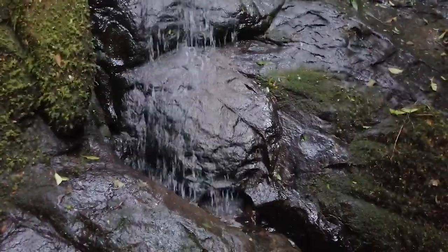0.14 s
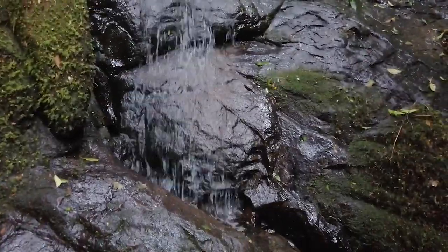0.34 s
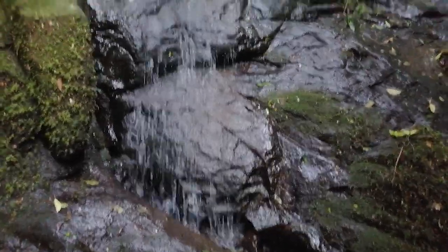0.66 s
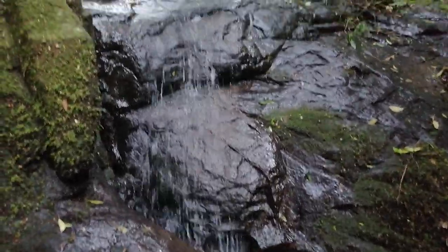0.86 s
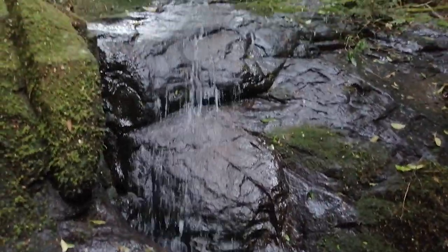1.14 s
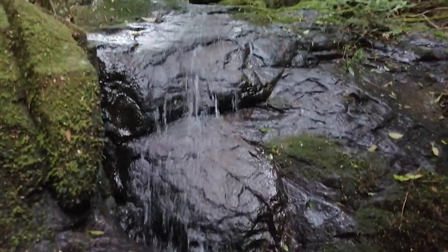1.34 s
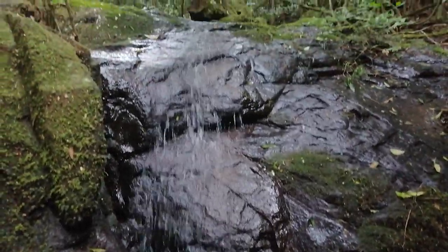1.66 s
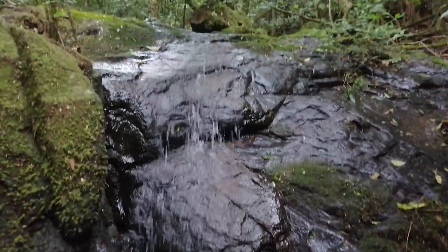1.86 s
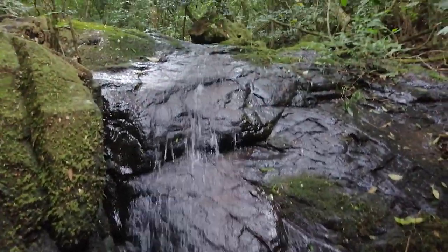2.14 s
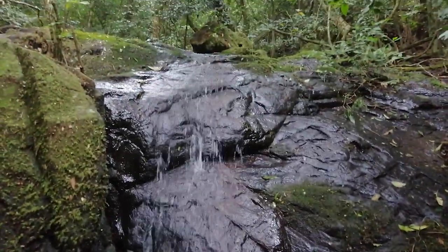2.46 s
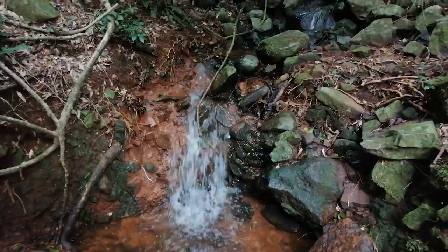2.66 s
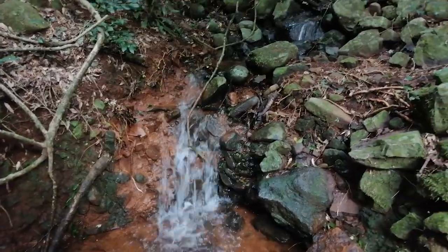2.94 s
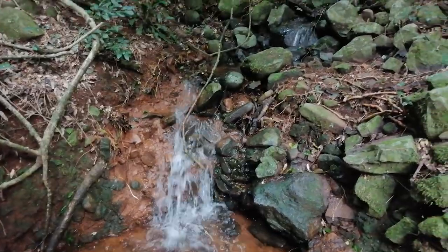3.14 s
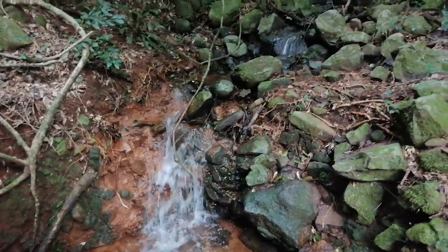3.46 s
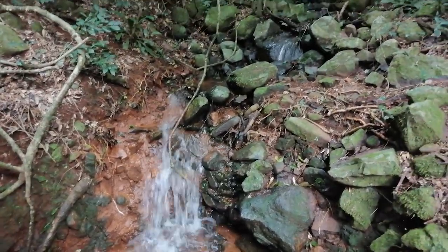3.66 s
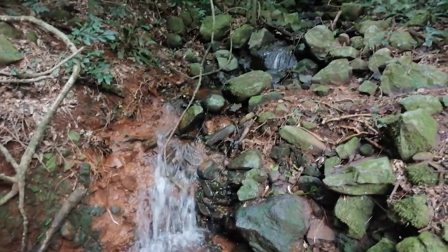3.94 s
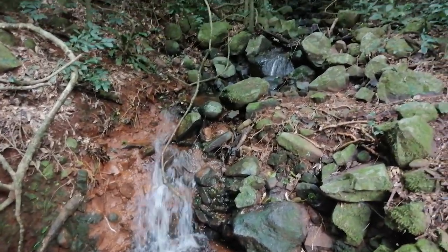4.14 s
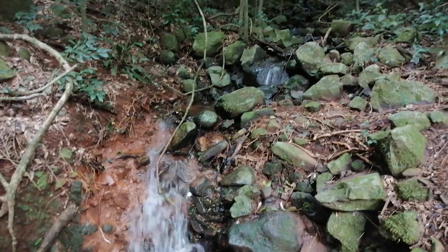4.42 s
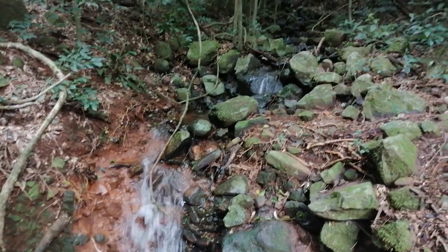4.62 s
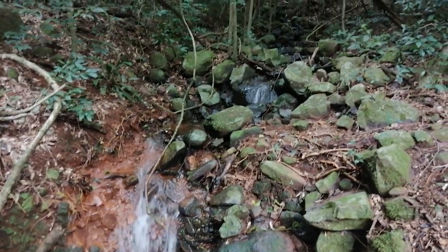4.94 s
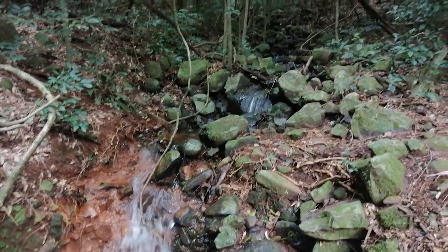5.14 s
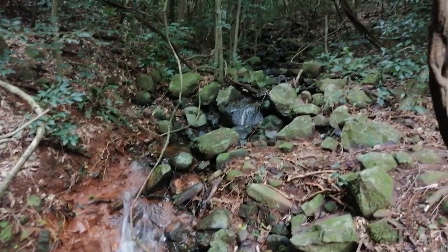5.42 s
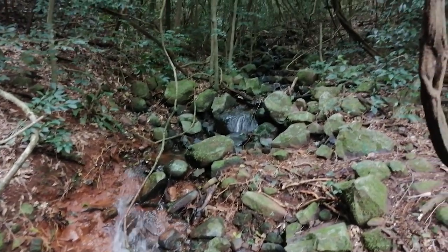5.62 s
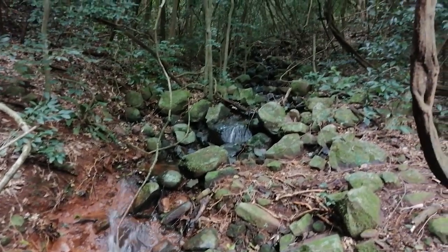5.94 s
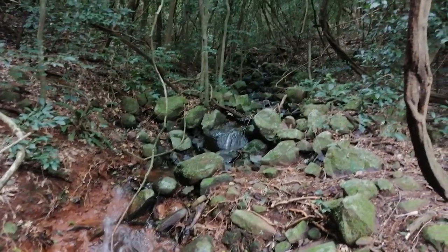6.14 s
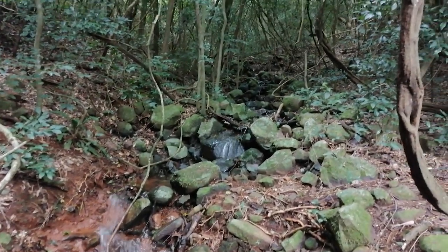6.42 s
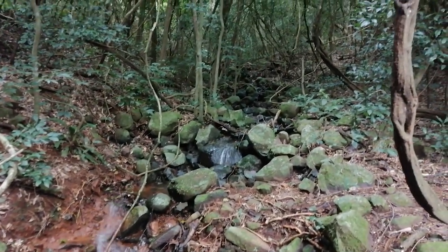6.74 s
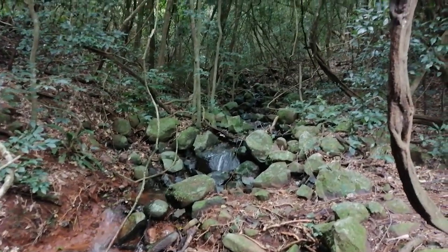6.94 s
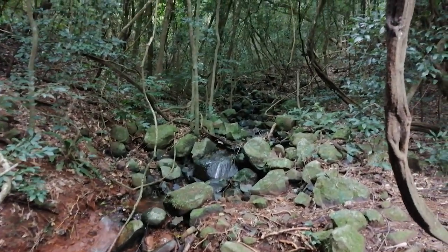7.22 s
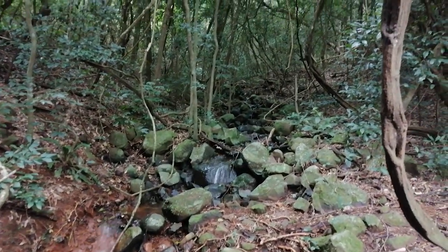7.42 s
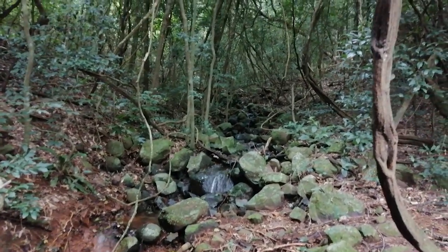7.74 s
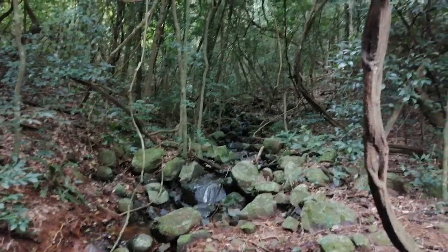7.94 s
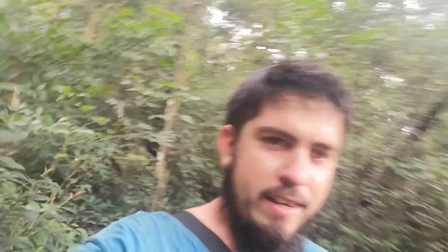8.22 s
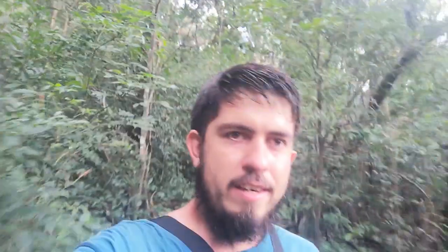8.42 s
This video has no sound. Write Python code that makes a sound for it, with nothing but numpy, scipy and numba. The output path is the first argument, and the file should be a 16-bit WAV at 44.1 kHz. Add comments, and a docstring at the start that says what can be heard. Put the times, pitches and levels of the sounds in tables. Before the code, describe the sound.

From 0 to about 2.6 seconds, a thin sheet of water trickles over a wet rock ledge: dense fizzing bubbles, small clicks on stone, mid-pitched hollow burbling and scattered ringing drops, slightly stronger in the first half second. Soft low air rumble brushes the microphones, most at the start and around 1.6 seconds. At 2.6 seconds the sound changes abruptly to a fuller, brighter cascade with a crisp low-treble splash, higher-pitched drips and small irregular surges. Soft pops tick on the left near 2.8 and between 3.6 and 4 seconds. Low pool plops emerge around 4, then become more noticeable from 6 onward. The close stereo pickup favours the right; the left is quieter and diffuse. Around 8 seconds the treble softens, and at 8.2 the water cuts off into silence.

```python
"""A small forest stream trickles over a wet rock ledge, then splashes down a little cascade into a pool.
Splashing is a dense swarm of ringing bubbles, clicks of drops on rock and noise, coloured for each side.
Gurgling is larger bubbles heard through resonant hollows; single drops, chirps and air pockets stand out.
The right microphone is nearer the water and peaks in the low treble; the left one pops softly a few times.
Puffs of air add a faint low rumble."""
import sys
import numpy as np
from scipy import signal
from scipy.fft import rfft, irfft
from scipy.io import wavfile
from numba import njit

SR = 44100
rng = np.random.default_rng(int(sys.argv[2]) if len(sys.argv) > 2 else 0)


def wav_record(signal):
    """Record a signal, one row per channel, as 16-bit PCM in the file named by sys.argv[1]."""
    frames = np.transpose(np.atleast_2d(signal))
    bounded = np.clip(frames, -1, 1)
    # unit amplitude maps onto the largest positive 16-bit level
    quanta = np.round(bounded * 32767).astype(np.int16)
    wavfile.write(sys.argv[1], SR, quanta)


N = 378360  # samples
MOVE_S, END_S = 2.638, 8.239  # the ledge gives way to the cascade; the flow ends
WANDER_HZ = 7.08  # corner frequency of the slow swaying, filling and pitch wavering


def from_db(db):
    """Logarithmic level: decibels become an amplitude ratio."""
    return 10 ** (np.asarray(db) / 20)


def rms_one(x):
    """Normalisation: the root-mean-square amplitude becomes one."""
    return x / np.sqrt(np.mean(x ** 2) + 1e-20)


def in_time(rows, t):
    """Linear interpolation: each column of a curve is read at the times t."""
    s, *columns = np.transpose(rows)
    return [np.interp(t, s, column) for column in columns]


def swells(rows, t):
    """Superposed Hann bells in dB, one for each row of middle s, length s and height dB."""
    bell = np.hanning(33)
    offsets = np.linspace(-.5, .5, 33)
    return sum(np.interp(t, s + length * offsets, db * bell) for s, length, db in rows)


def drift(corner_hz, size):
    """Low-passed noise: a slow random curve of rms one, made at every 40th sample."""
    pole = np.exp(-2 * np.pi * corner_hz * 40 / SR)
    noise = rng.standard_normal(size // 40 + 2002)
    slow = signal.lfilter([1], [1, -2 * pole, pole * pole], noise)[2000:]  # drop the filter's start
    return np.interp(np.arange(size) / 40, np.arange(len(slow)), rms_one(slow))


def resonance(x, hz, width_hz):
    """Simple resonance: a two-pole filter with a gain of one at its peak."""
    r = np.exp(-np.pi * width_hz / SR)
    zeros = np.array([1, 0, -1]) * (1 - r * r) / 2
    poles = [1, -2 * r * np.cos(2 * np.pi * hz / SR), r * r]
    return signal.lfilter(zeros, poles, x + 1e-18)


def colour(x, hz, db, size=4096):
    """Minimum-phase filtering: a causal spectrum through the points, so nothing sounds before its drop."""
    grid = np.maximum(np.arange(size // 2 + 1) * SR / size, 1)
    cepstrum = irfft(np.log(from_db(np.interp(np.log(grid), np.log(hz), db))))
    # folding the cepstrum forward in time gives the minimum phase
    cepstrum[1:size // 2] *= 2
    cepstrum[size // 2 + 1:] = 0
    response = irfft(np.exp(rfft(cepstrum)))
    return signal.oaconvolve(x, response)[:len(x)]


@njit
def ring_bubbles(size, starts, heights, pitches, cycles, rise):
    """Bubble resonance: a sine swells as the neck closes, decays 60 dB over its cycles and glides in pitch."""
    out = np.zeros(size)
    for k in range(len(starts)):
        length = cycles[k] * SR / pitches[k]
        step, height, phase = 2 * np.pi * pitches[k] / SR, heights[k], 0.
        fade = np.exp(-np.log(1000) / length)
        for i in range(min(int(length), size - starts[k])):
            closed = min(phase / (3 * np.pi), 1.)  # the neck closes over a cycle and a half
            swell = closed * closed * (3 - 2 * closed)
            out[starts[k] + i] += height * swell * np.sin(phase)
            phase += step * (1 + rise[k] * i / length)
            height *= fade
    return out


def bubbles(size, per_s, low_hz, high_hz, crowding, cycles, spread_db, rise):
    """Random superposition of bubbles, most faint and a few loud; more crowding makes high ones commoner."""
    chance = np.random.default_rng(rng.integers(1 << 30))
    when, rank, force, life, glide = chance.random((int(per_s * size / SR), 5)).T
    low, high = low_hz ** crowding, high_hz ** crowding
    hz = (low + (high - low) * rank) ** (1 / crowding)
    strength_db = spread_db * np.minimum(-np.log(1 - force), 4.0)
    # rare sizes sound louder, which keeps the power per Hz even
    heights = hz ** (1 - crowding / 2) * from_db(strength_db)
    starts = (when * size).astype(np.int64)
    # most glide upwards, some downwards
    return rms_one(ring_bubbles(size, starts, heights, hz, cycles * (.5 + life), rise * (2 * glide - .5)))


def slaps(size, per_s, spread_db):
    """Random impulses: drops hit bare rock as sharp clicks of uneven strength and either sign."""
    strength = from_db(spread_db * np.minimum(rng.exponential(1, size), 4))
    signed = strength * rng.choice([-1, 1], size)
    return rms_one(signed * (rng.random(size) < per_s / SR))


def splash_source(size, fizz_per_s, slap_db, rush_db, spatter_db, spatter_hz, surge):
    """Superposed sources: bubble fizz, slaps and short spatter over the smooth rush of farther water."""
    fizz = bubbles(size, fizz_per_s, low_hz=597.0, high_hz=14096, crowding=1.45,
                   cycles=58, spread_db=2.5, rise=0.27)
    clicks = from_db(slap_db) * slaps(size, per_s=3000, spread_db=2.0)
    spatter = from_db(spatter_db) * bubbles(size, per_s=260, low_hz=spatter_hz / 3, high_hz=spatter_hz,
                                            crowding=1.5, cycles=8.9, spread_db=1.7, rise=0.17)
    rush = from_db(rush_db) * rng.standard_normal(size)
    return surge * rms_one(fizz + clicks + spatter + rush)


def splash(t, spectrum, side, fizz_per_s, slap_db, rush_db, spatter_db, spatter_hz, surge_db, lag_s):
    """Partial coherence: both sides share direct sound, which swells in lumps; the left adds scattered sound."""
    size = len(t)
    hz, left_db, right_db, likeness = np.transpose(spectrum)
    likeness = np.clip(likeness, .02, .98)
    surge = from_db(surge_db * drift(53, size))
    direct, scattered = [splash_source(size, fizz_per_s, slap_db, rush_db, spatter_db, spatter_hz, surge)
                         for _ in range(2)]
    # the right microphone passes the sound a little later
    right = np.interp(t - lag_s, t, colour(direct, hz, right_db))
    # the left side faces away and hears more of what the rocks scatter
    left_direct = colour(direct, hz, left_db + 20 * np.log10(likeness))
    left_scattered = colour(scattered, hz, left_db + 10 * np.log10(1 - likeness ** 2))
    side_db, = in_time(side, t)
    left = (left_direct + left_scattered) * from_db(side_db - side_db.mean())
    pair = np.array([left, right])
    return pair / pair.mean(0).std()


def through_hollows(swarm, hollows):
    """Parallel resonators: alternating signs keep neighbours from cancelling between their peaks."""
    total = sum((-1) ** k * from_db(db) * resonance(swarm, hz, width_hz)
                for k, (hz, width_hz, db) in enumerate(hollows))
    return rms_one(total)


def gurgle(size, hollows, per_s, cycles, spread_db, left_db, apart, waver):
    """Cavity resonance: large bubbles sound through hollows; their pitch wavers with the water level."""
    near, far = [through_hollows(bubbles(size, per_s, low_hz=110.5, high_hz=980.4, crowding=2.1,
                                         cycles=cycles, spread_db=spread_db, rise=0.3), hollows)
                 for _ in range(2)]
    left = from_db(left_db) * rms_one(near + apart * far)
    # a clock of uneven speed bends the pitch of both sides together
    clock = np.cumsum(np.exp(waver * drift(WANDER_HZ, size)))
    position = clock / clock[-1] * (size - 1)
    pair = np.array([np.interp(position, np.arange(size), x) for x in (left, near)])
    return pair / pair.mean(0).std()


# The jet thickens into a lump or briefly thins.
# Each row: middle in seconds, length in seconds, change of the splash in dB (scaled down on the left).
JET_SURGES = [(0.04, 0.15, 1.5), (0.30, 0.072, -0.5), (0.415, 0.05, 0.5), (0.57, 0.046, -2),
              (0.675, 0.093, 2.5), (1.115, 0.044, -2.5), (1.235, 0.069, 1.5), (1.385, 0.048, -2.5),
              (1.55, 0.068, 4), (1.62, 0.06, -1), (1.89, 0.14, -1), (2.39, 0.044, -2), (2.57, 0.11, -2.5),
              (2.675, 0.061, 1.5), (2.851, 0.064, 2.5), (3.236, 0.063, 1), (3.745, 0.084, -2.5),
              (3.804, 0.037, 3.5), (3.845, 0.065, -2.5), (4.035, 0.023, -1.5), (4.37, 0.14, -1),
              (4.45, 0.06, 1.5), (4.54, 0.066, 0.5), (4.795, 0.031, -4.5), (5.13, 0.06, 2),
              (5.255, 0.05, -1.5), (5.425, 0.084, 1), (5.59, 0.048, -4), (5.65, 0.26, 1.5),
              (5.74, 0.053, -0.5), (6.155, 0.031, 2), (6.255, 0.059, 1.5), (6.62, 0.06, 1.5),
              (7.47, 0.082, 0.3), (7.572, 0.045, 1.5), (7.67, 0.082, -3.5), (7.85, 0.1, 1.5)]


def flow(levels, t):
    """Amplitude modulation: splash (left, right) and gurgle levels in dB, with lumps and random swaying."""
    splash_db, gurgle_db = in_time(levels, t)
    # each near drop falls within a small lump of water: 0.022 s long, 0.05 dB high
    drop_lumps = [(s, 0.022, 0.05) for s, _, _ in NEAR_DROPS]
    # the left side hears more of the whole stream and less of the jet's lumps
    lumps_db = swells(JET_SURGES + drop_lumps, t) * np.array([[0.87], [1]])
    sway_db = 0.25 * drift(WANDER_HZ, len(t))
    # the hollows fill and drain at random, which swells the gurgle
    filling_db = 0.53 * drift(WANDER_HZ, len(t))
    return splash_db + lumps_db + sway_db, gurgle_db + filling_db


# Splashing spectrum at the ledge. Each row: frequency in Hz, left and right relative density in dB per Hz,
# left-right likeness from 0 to 1.
LEDGE_SPECTRUM = [(35.3, -29, -35, 0), (101, -30, -28.5, 0.94), (203, -36, -31, 1), (335, -24, -16, 0.3),
                  (970, -22.5, -18.5, 0.17), (1500, -21, -11, 0.04), (1760, -20.5, -12.5, 0.9),
                  (2550, -19, -8, 0.2), (3580, -22.5, -4.5, 0.2), (5380, -23, -11, 0.7),
                  (6560, -22, -26.5, 0.06), (7200, -24, -18.5, 0.4), (9800, -22, -26, 0),
                  (11840, -28.5, -27.5, 0.04), (15000, -28.5, -25, 0.85)]
# Hollows under the ledge. Each row: resonance in Hz, width in Hz, relative level in dB.
LEDGE_CAVITIES = [(365, 61, -6.5), (439, 52, -2.5), (623, 38, -2.5), (729, 26, -4), (824, 45, -3)]
# Flow over the ledge. Each row: time in seconds, splash in dB, gurgle in dB (before a fixed trim).
LEDGE_LEVELS = [(0.0, -33, -43.5), (0.55, -35.5, -45), (1.3, -35.5, -44.5), (2.63, -35, -46)]
# Side of the splashing. Each row: time in seconds, left minus right in dB (only the change from the mean acts).
LEDGE_BALANCE = [(0.0, -13.5), (0.66, -11), (2.6, -10.5)]


def ledge(t):
    """Bubble noise and cavity resonance: a thin sheet trickles off the ledge and burbles underneath."""
    splash_db, gurgle_db = flow(LEDGE_LEVELS, t)
    spray = splash(t, LEDGE_SPECTRUM, LEDGE_BALANCE, fizz_per_s=12000, slap_db=-1.5, rush_db=-2.0,
                   spatter_db=-14.0, spatter_hz=5140, surge_db=1.0, lag_s=0.00003)
    burble = gurgle(len(t), LEDGE_CAVITIES, per_s=280, cycles=36, spread_db=0.7,
                    left_db=-9.5, apart=0.9, waver=0.055)
    return from_db(splash_db - 0.53) * spray + from_db(gurgle_db - 4.0) * burble


# Puffs of air brush the microphones.
# Each row: middle in seconds, length in seconds, rise above the calm in dB.
AIR_PUFFS = [(0.1, 1, 27), (0.63, 0.25, 15), (1.6, 0.45, 22), (2.43, 0.2, 20), (4.2, 0.9, 8),
             (6.12, 0.3, 10), (6.6, 0.3, 12), (7.98, 0.6, 16)]


def air(t, top_hz, left_db):
    """Band-limited noise: a faint rumble rises with each puff, unrelated at the two microphones."""
    band = signal.butter(2, [28, top_hz], "band", fs=SR, output="sos")
    rumble = rms_one(signal.sosfilt(band, rng.standard_normal((2, N))))
    level_db = -83.5 + swells(AIR_PUFFS, t)  # calm level plus puffs
    return from_db([[left_db], [0]]) * from_db(level_db) * rumble * (t < END_S)


def single_bubbles(rows, cycles, rise, gain_db, left_db):
    """Isolated bubble resonances: rows of start s, level dB and Hz share one ring and one upward glide."""
    s, db, hz = np.transpose(rows)
    each = np.ones(len(s))
    starts = (s * SR).astype(np.int64)
    rings = ring_bubbles(N, starts, from_db(db + gain_db), hz, cycles * each, rise * each)
    return from_db([[left_db], [0]]) * rings


# Middling bubbles. Each row: start in seconds, level in dB before a shared gain, starting pitch in Hz.
MIDDLING_BUBBLES = [(0.002, -25, 2090), (0.028, -28, 1610), (0.043, -29.5, 1190), (0.047, -26.5, 1390),
                    (0.049, -29.5, 1900), (0.395, -31, 2410), (0.468, -24.5, 1990), (0.542, -23, 2090),
                    (0.617, -27, 2150), (0.634, -23.5, 2260), (0.716, -31, 1280), (1.036, -33, 1150),
                    (1.495, -31, 1490), (1.558, -30, 2370), (1.584, -26, 1500), (1.670, -28, 1390),
                    (1.895, -26, 1490), (2.021, -22.5, 2400), (2.026, -25, 2020), (2.053, -27, 1820),
                    (2.607, -24, 2850), (3.194, -33, 970), (3.224, -22, 2790), (3.148, -29, 2350),
                    (3.491, -27, 1880), (3.552, -26, 2300), (3.806, -26.5, 2450), (3.882, -24, 2360),
                    (4.194, -30, 1260), (4.370, -34, 970), (4.820, -24.5, 2460), (5.032, -25, 2615),
                    (5.052, -25, 2330), (5.366, -28, 1460), (5.614, -25, 2310), (5.951, -29, 1390),
                    (6.150, -30, 2240), (6.686, -27, 1940), (6.946, -27, 2500), (7.087, -29, 1460),
                    (7.567, -28, 2530), (7.828, -22, 2670), (7.858, -27, 1760), (8.097, -30.5, 1390)]


def chirps():
    """Rising resonance: middling bubbles chirp out of the splash."""
    return single_bubbles(MIDDLING_BUBBLES, cycles=77, rise=0.11, gain_db=-1.5, left_db=-13.0)


# Single near drops. Each row: start in seconds, level in dB before each layer's gain, bubble pitch in Hz.
NEAR_DROPS = [(0.014, -20, 2020), (0.038, -17, 3650), (0.043, -20, 4280), (0.052, -15, 3700),
              (0.059, -15, 4400), (0.1262, -19, 3640), (0.1598, -16.5, 2570), (0.167, -17, 4680),
              (0.277, -10, 3870), (0.290, -20, 4300), (0.3267, -15, 3620), (0.372, -17, 3550),
              (0.403, -17, 3900), (0.4146, -16, 3380), (0.417, -16.5, 2900), (0.519, -21, 4300),
              (0.675, -18, 3820), (0.73, -15, 3760), (0.77, -15, 3400), (0.7835, -16, 3600),
              (1.0175, -18, 2760), (1.5219, -16, 3860), (1.5435, -20, 3640), (1.802, -17, 4390),
              (2.024, -14.5, 2960), (2.332, -19, 4410), (2.4477, -22, 2490), (2.606, -30, 2840),
              (2.662, -10, 5300), (2.686, -13, 4820), (2.860, -19, 4350), (3.003, -16, 4950),
              (3.027, -21, 3030), (3.091, -15, 4460), (3.123, -18, 5200), (3.232, -18, 5250),
              (3.3827, -19, 5000), (3.6087, -20, 4940), (3.6328, -19, 4850), (3.784, -22, 4970),
              (3.797, -17, 3500), (3.805, -15.5, 5840), (3.812, -19, 4430), (4.041, -14, 4820),
              (4.125, -19, 5640), (4.145, -22, 5600), (4.513, -16, 5680), (4.571, -15, 4560),
              (4.651, -13, 5340), (4.6733, -9, 5250), (4.9374, -10, 4700), (5.055, -15.5, 5250),
              (5.0803, -20, 4890), (5.1023, -19, 4700), (5.144, -13, 5300), (5.1752, -14, 5700),
              (5.233, -12.5, 5600), (5.4337, -17, 5510), (5.6306, -13, 4940), (5.788, -13, 5030),
              (6.2203, -13, 5670), (6.2942, -15.5, 5040), (6.308, -9.5, 5170), (6.802, -12.5, 4620),
              (6.8946, -14, 4830), (7.105, -10.5, 5100), (7.1774, -11, 5350), (7.567, -15, 4500),
              (7.569, -17, 3470), (8.183, -18, 4830)]


def near_drops():
    """Bubble resonance: each near drop traps a bubble that rings."""
    return single_bubbles(NEAR_DROPS, cycles=52, rise=0.057, gain_db=-1.5, left_db=-25.0)


def splats(attack_s, decay_s, width_share, gain_db, left_db):
    """Filtered noise bursts: each near drop throws up short spray, pitched around its bubble."""
    out, t = np.zeros((2, N)), np.arange(SR // 20) / SR
    envelope = -np.expm1(-t / attack_s) * np.exp(-t / decay_s)
    for s, db, hz in NEAR_DROPS:
        burst = from_db(db + gain_db) * envelope * rng.standard_normal((2, len(t)))
        once = resonance(burst, hz, width_share * hz)
        start = int(s * SR)
        out[:, start:start + len(t)] += resonance(once, hz, width_share * hz)
    return from_db([[left_db], [0]]) * out


# Big pockets of air. Each row: start in seconds, level in dB on the right, starting pitch in Hz,
# cycles of ring, glide as a share of the pitch.
AIR_POCKETS = [(0.030, -37, 790, 45, 0.017), (0.078, -31, 760, 39, -0.17), (0.285, -27, 630, 36, 0.33),
               (0.355, -25, 814, 32, 0.15), (0.385, -32, 372, 28, 0.12), (0.421, -27, 764, 64, 0.22),
               (0.443, -30, 640, 66, -0.077), (0.686, -33, 726, 69, 0.077), (0.775, -35, 810, 49, -0.15),
               (0.836, -35, 424, 44, 0.25), (0.862, -34, 830, 45, 0.05), (0.942, -32, 825, 50, 0.084),
               (0.972, -35, 644, 40, 0.22), (1.075, -33.5, 800, 43, 0), (1.035, -37, 660, 35, 0.18),
               (1.108, -37, 810, 35, 0.08), (1.439, -37, 824, 100, 0.21), (1.512, -27, 440, 15, 0.16),
               (1.572, -29, 719, 57, 0.16), (1.608, -32, 695, 80, -0.067), (1.839, -32.5, 437, 59, 0.24),
               (1.928, -32, 810, 55, -0.032), (1.954, -30, 860, 91, -0.031), (1.981, -32, 830, 34, -0.038),
               (2.060, -34, 416, 26, 0.035), (2.145, -36, 635, 30, 0.14), (2.181, -29.5, 905, 45, -0.1),
               (2.269, -38, 302, 22, 0.15), (2.272, -31.5, 617, 41, 0.062), (2.373, -32.5, 633, 57, 0.032),
               (2.426, -32, 890, 89, 0.14), (2.590, -25.5, 874, 28, -0.16), (2.618, -28.5, 796, 41, -0.36),
               (3.199, -31, 840, 29, 0.21), (3.503, -32, 835, 29, 0.15), (4.296, -36, 237, 16, 0.18),
               (4.455, -34.5, 250, 24, 0.11), (4.810, -32.5, 682, 83, -0.16), (4.923, -27, 720, 22, 0.25),
               (5.150, -31, 855, 22, 0.23), (5.184, -28, 720, 27, 0.062), (5.290, -37.5, 238, 25, 0.1),
               (5.898, -39, 260, 12, 0.15), (6.108, -43, 135, 11, 0.1), (6.118, -38, 205, 13, 0.1),
               (6.145, -34, 250, 12, 0.15), (6.182, -34, 640, 33, 0.091), (6.402, -37, 302, 19, 0.19),
               (6.516, -30, 810, 42, 0.1), (6.626, -36, 297, 12, 0.15), (6.866, -34, 626, 29, -0.0043),
               (7.120, -38, 253, 15, 0.19), (7.151, -33, 675, 25, 0.1), (7.168, -33.5, 775, 50, 0.083),
               (7.507, -28.5, 743, 34, 0.1), (7.758, -37, 240, 16, 0.15), (7.826, -29, 870, 34, 0.1),
               (7.973, -34.5, 867, 64, 0.11), (8.131, -29, 282, 13, 0.2), (8.133, -27, 755, 20, 0.1),
               (8.148, -36.5, 310, 34, 0.14)]


def air_pockets(left_db):
    """Gliding resonance: big bubbles glug, rising as they surface and falling if dragged under."""
    s, db, hz, cycles, glide = np.transpose(AIR_POCKETS).copy()
    rings = ring_bubbles(N, (s * SR).astype(np.int64), from_db(db), hz, cycles, glide)
    return from_db([[left_db], [0]]) * rings


# Soft pops and ticks on the left. Each row: middle in seconds, level in dB before the bass cut,
# pitch in Hz, time constant of the ring in ms.
LEFT_POPS = [(0.1855, -28.5, 650, 7.2), (1.5108, -25.5, 305, 4.5), (2.8208, -30, 500, 1.5),
             (2.823, -22, 493, 3), (2.8249, -21.5, 490, 3), (2.8330, -30, 421, 2.3),
             (2.9159, -23, 900, 0.4), (3.5739, -25, 750, 0.35), (3.6491, -21, 1500, 0.15),
             (3.658, -37.5, 235, 9.4), (3.9648, -29, 650, 1.8)]


def pops(edge_s, gain_db, right_db, low_cut_share):
    """Two-sided decay: a ring swells, snaps over in a sharp edge and dies as fast, its bass cut away."""
    out = np.zeros(N)
    for s, db, hz, ring_ms in LEFT_POPS:
        span = np.arange(int((s - .04) * SR), int((s + .04) * SR))
        t = span / SR - s
        ring = np.exp(-np.abs(t) * 1000 / ring_ms) * np.cos(2 * np.pi * hz * t)
        pop = np.tanh(t / edge_s) * ring
        bass_cut = signal.butter(3, low_cut_share * hz, "high", fs=SR, output="sos")
        out[span] += from_db(db + gain_db) * signal.sosfiltfilt(bass_cut, pop)
    return from_db([[0], [right_db]]) * out


# Fine droplets on the rock close by.
# Each row: start in seconds, level in dB before a shared gain, bubble pitch in Hz.
FINE_DROPLETS = [(0.6471, -31, 7250), (0.8322, -34, 7570), (0.9599, -40, 7840), (1.4258, -37, 8990),
                 (1.8528, -34, 7750), (1.912, -31, 8600), (2.0444, -36, 7810), (2.5443, -35, 7940)]


def flecks():
    """High bubble resonance: fine droplets tick on the rock close by."""
    return single_bubbles(FINE_DROPLETS, cycles=42, rise=0.049, gain_db=8.5, left_db=-2.0)


# Splashing spectrum at the cascade. Each row: frequency in Hz, left and right relative density in dB per Hz,
# left-right likeness from 0 to 1.
CASCADE_SPECTRUM = [(34.7, -44.5, -44, 0.041), (77.3, -36, -38, 0.57), (146, -30.5, -23.5, 0.94),
                    (402, -28, -21, 0.85), (1020, -27.5, -17, 0.89), (1390, -22, -11.5, 0.98),
                    (2000, -20.5, -12, 0.073), (4580, -27.5, -5.5, 0.68), (5030, -27, -3.5, 0.16),
                    (5740, -30.5, -3.5, 0.23), (6760, -30, -19, 0.16), (8340, -35.5, -37.5, 0.076),
                    (10040, -29.5, -36, 0.12), (14770, -42, -32, 0.057)]
# Hollows between the stones. Each row: resonance in Hz, width in Hz, relative level in dB.
CASCADE_CAVITIES = [(541, 100, -2), (685, 110, -0.5), (837, 74, 1)]
# Hollows of the pool. Each row: resonance in Hz, width in Hz, relative level in dB.
POOL_CAVITIES = [(148, 20, -6.5), (244, 25, -1), (313, 51, -4)]
# Deep plops in the pool. Each row: time in seconds, level in dB (before a fixed trim).
PLOP_LEVELS = [(2.65, -87), (3.4, -73), (4.2, -63), (4.8, -74.5), (6.1, -59.5), (6.7, -64), (7.3, -61.5),
               (8.23, -57)]
# Flow down the cascade. Each row: time in seconds, splash in dB, gurgle in dB (before a fixed trim).
CASCADE_LEVELS = [(2.65, -34.5, -51.5), (3.6, -33.5, -50.5), (4.8, -33, -53), (6.2, -34.5, -50),
                  (7.6, -34.5, -52.5), (8.23, -35, -49.5)]
# Side of the splashing. Each row: time in seconds, left minus right in dB (only the change from the mean acts).
CASCADE_BALANCE = [(2.9, -17.5), (7.89, -15.5), (8.2, -13)]
# The treble peak on the right softens. Each row: time in seconds, share taken away from 0 to 1.
TREBLE_SOFTENING = [(7.85, 0), (8.0, 0.26), (8.15, 0.72)]


def cascade(t):
    """Bubble noise and cavity resonance: a fuller jet tumbles down a clay step and plops into a pool."""
    splash_db, gurgle_db = flow(CASCADE_LEVELS, t)
    softening, = in_time(TREBLE_SOFTENING, t)
    pool_db, = in_time(PLOP_LEVELS, t)
    spray = splash(t, CASCADE_SPECTRUM, CASCADE_BALANCE, fizz_per_s=15000, slap_db=-2.5, rush_db=-2.0,
                   spatter_db=-10.5, spatter_hz=6500, surge_db=1.26, lag_s=0.0001234)
    spray[1] -= softening * resonance(spray[1], hz=5570, width_hz=1650)
    burble = gurgle(len(t), CASCADE_CAVITIES, per_s=300, cycles=33, spread_db=1.5,
                    left_db=-5.5, apart=0.6, waver=0.03)
    plops = gurgle(len(t), POOL_CAVITIES, per_s=450, cycles=14.0, spread_db=1.6,
                   left_db=-4.5, apart=0.34, waver=0.0401)
    water = from_db(splash_db - 0.5) * spray + from_db(gurgle_db - 3.5) * burble
    return water + from_db(pool_db - 0.8) * plops


def scene():
    """Superposition: the ledge, then the cascade, under the single sounds; silence once the last rings die."""
    t = np.arange(N) / SR
    ledge_water = ledge(t[t < MOVE_S])
    cascade_water = cascade(t[(t >= MOVE_S) & (t < END_S)])
    water = np.hstack([ledge_water, cascade_water, np.zeros((2, np.sum(t >= END_S)))])
    spray = splats(attack_s=0.002, decay_s=0.006, width_share=0.33, gain_db=-8.5, left_db=-18.0)
    drops = near_drops() + spray + flecks()
    pockets = chirps() + air_pockets(left_db=-6.5)
    popping = pops(edge_s=0.0001, gain_db=0, right_db=-24, low_cut_share=0.68)
    return water + drops + pockets + popping + air(t, top_hz=90, left_db=-15.5)


def record(dry):
    """Band limiting: a steep elliptic low-pass removes the top above 15.2 kHz."""
    low_pass = signal.ellip(12, .1, 80, 15200, fs=SR, output="sos")
    return signal.sosfilt(low_pass, dry)


dry = scene()
out = record(dry)
wav_record(out)
```